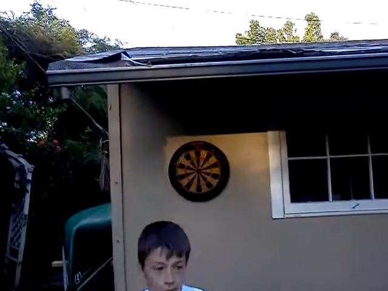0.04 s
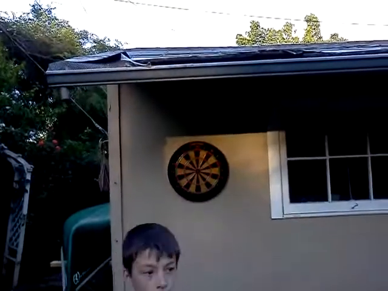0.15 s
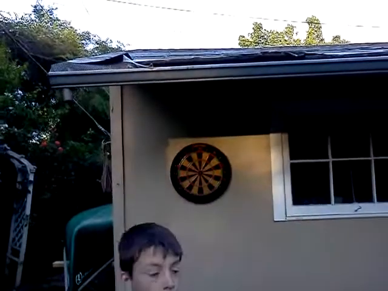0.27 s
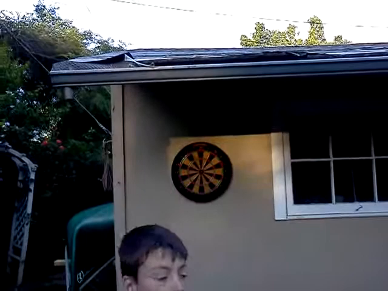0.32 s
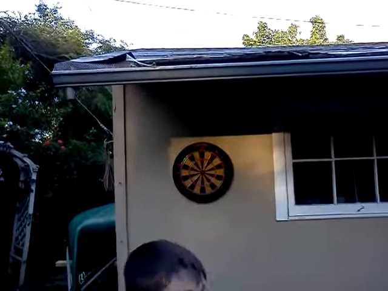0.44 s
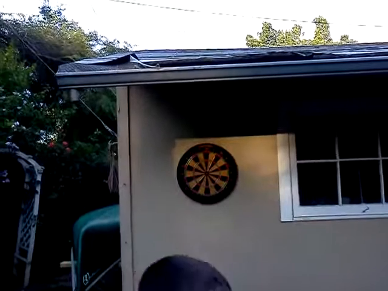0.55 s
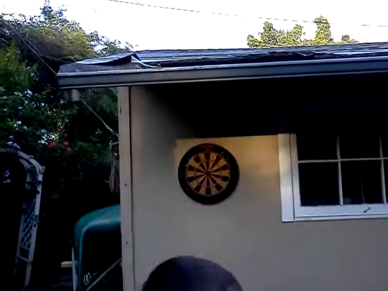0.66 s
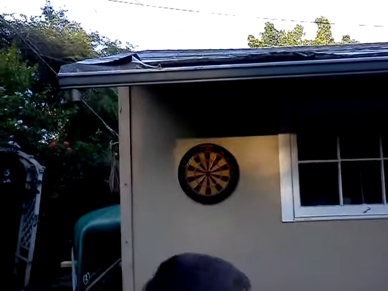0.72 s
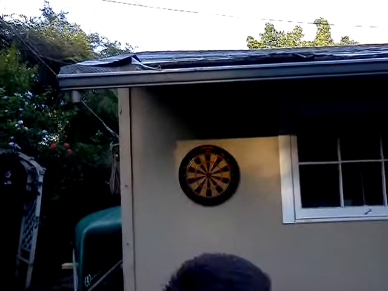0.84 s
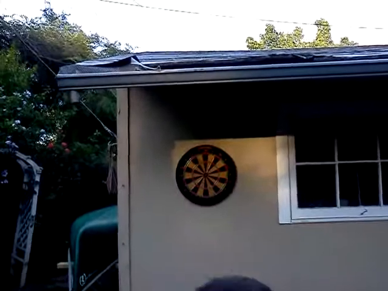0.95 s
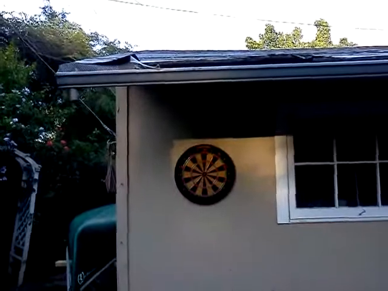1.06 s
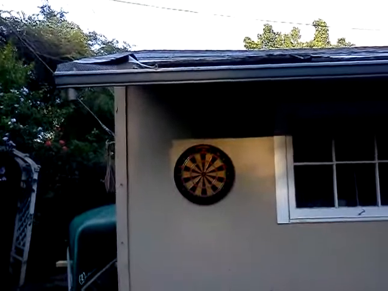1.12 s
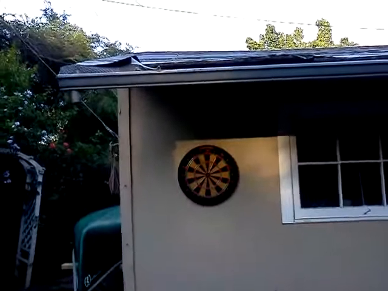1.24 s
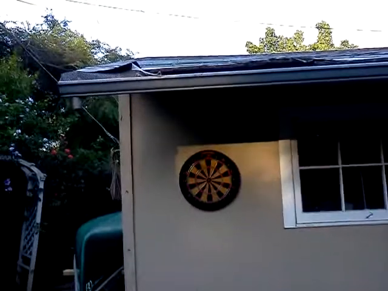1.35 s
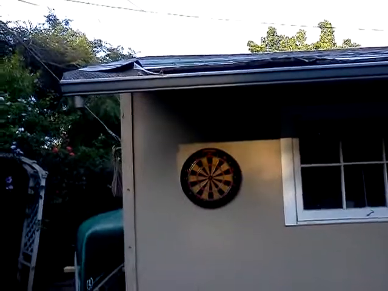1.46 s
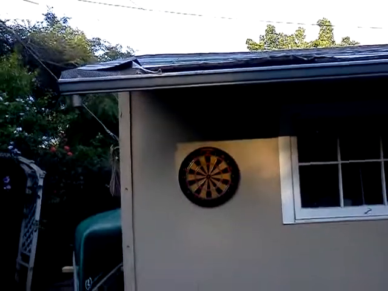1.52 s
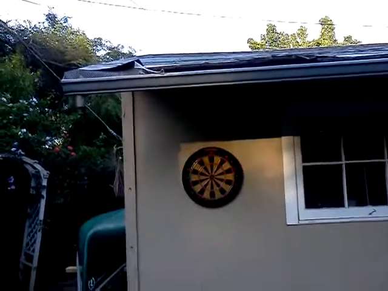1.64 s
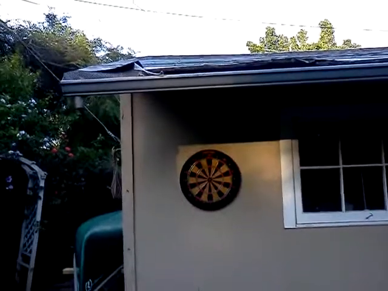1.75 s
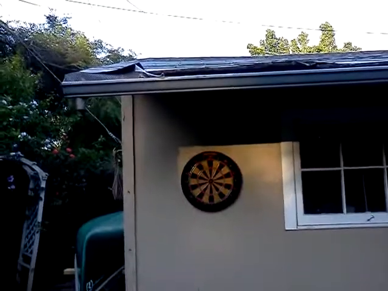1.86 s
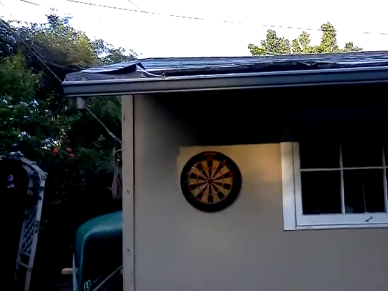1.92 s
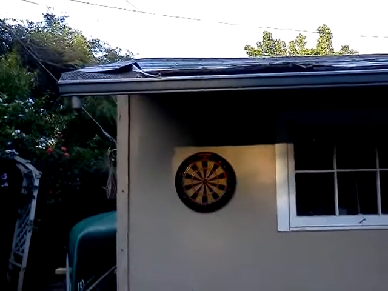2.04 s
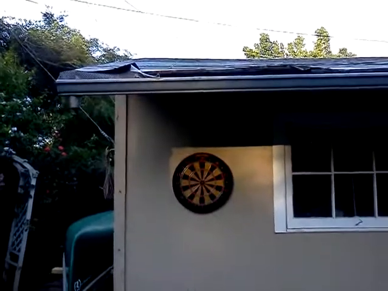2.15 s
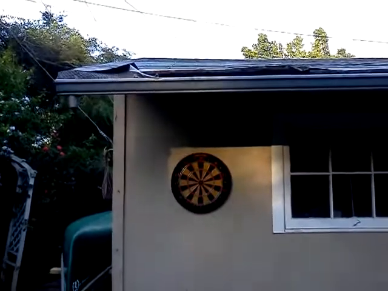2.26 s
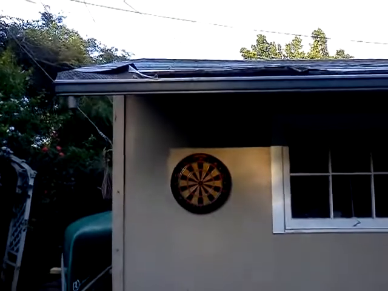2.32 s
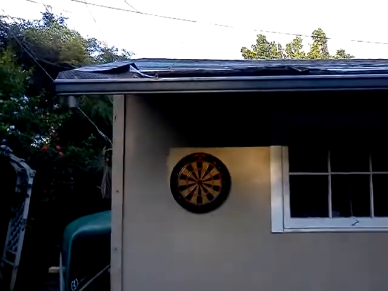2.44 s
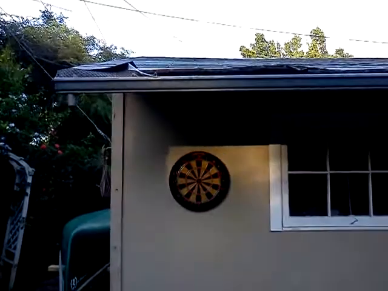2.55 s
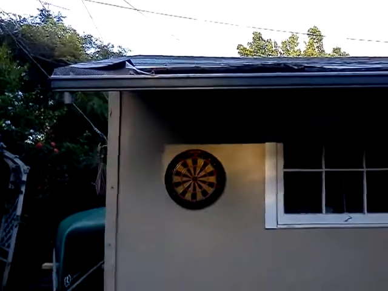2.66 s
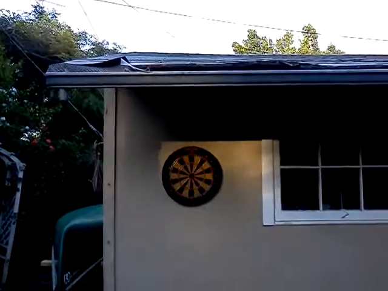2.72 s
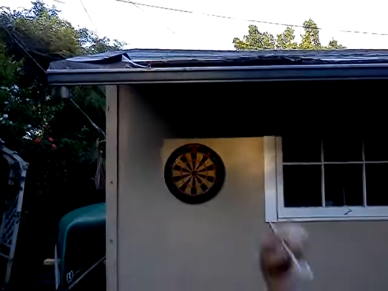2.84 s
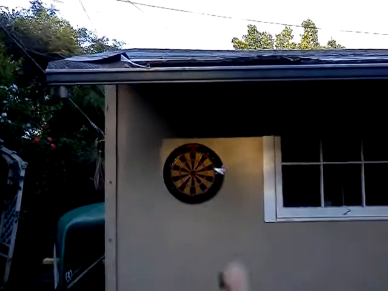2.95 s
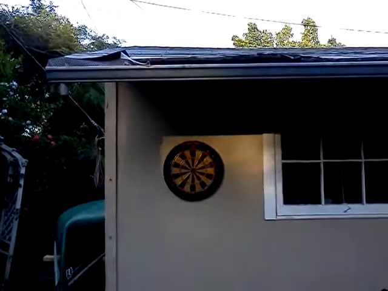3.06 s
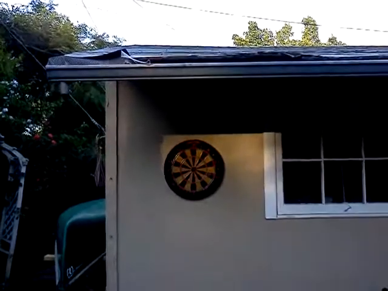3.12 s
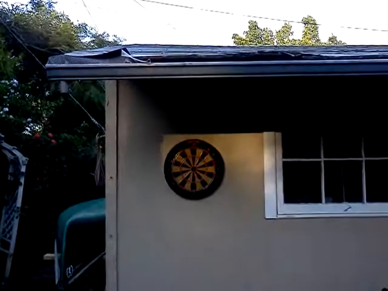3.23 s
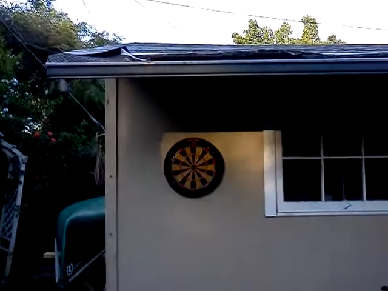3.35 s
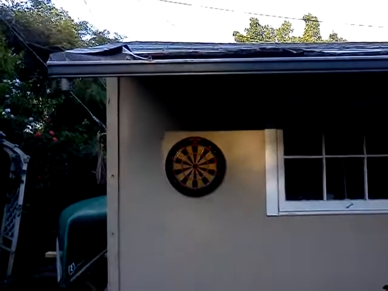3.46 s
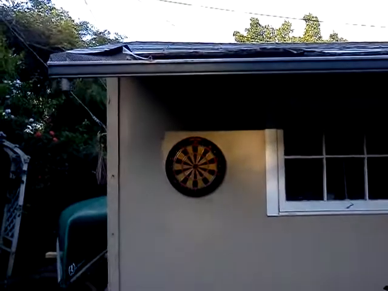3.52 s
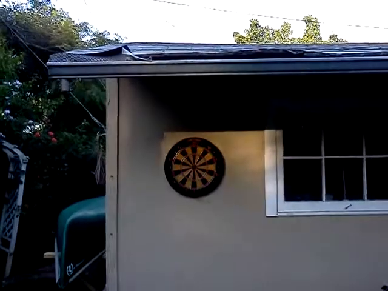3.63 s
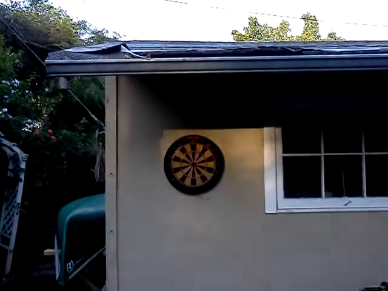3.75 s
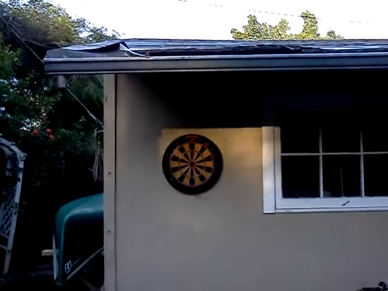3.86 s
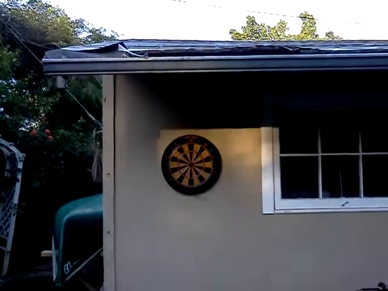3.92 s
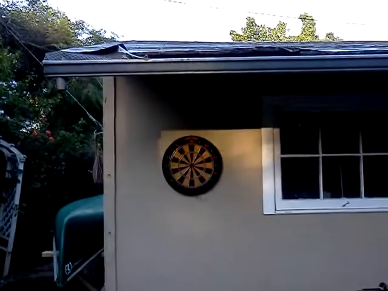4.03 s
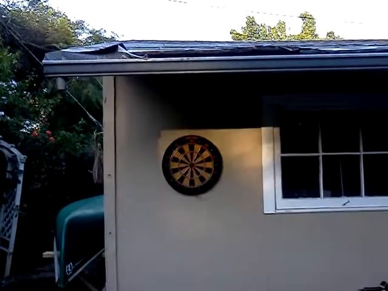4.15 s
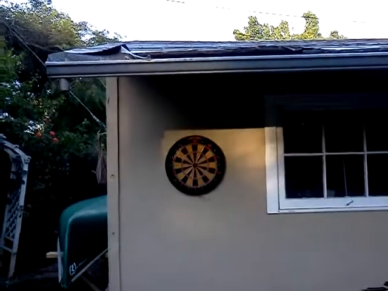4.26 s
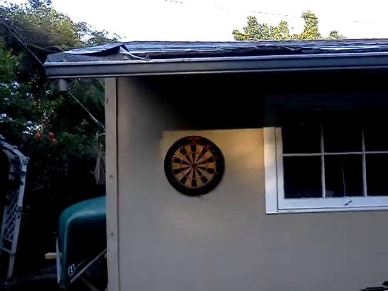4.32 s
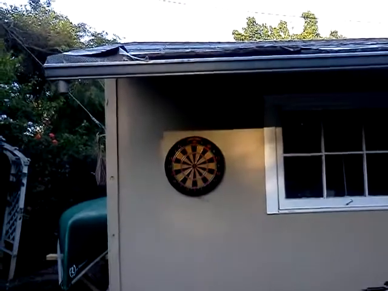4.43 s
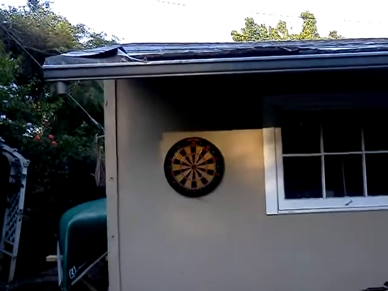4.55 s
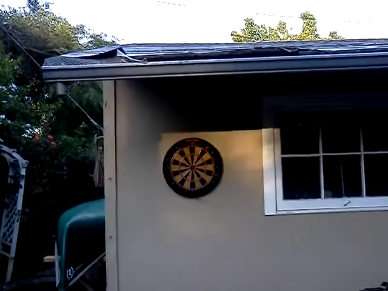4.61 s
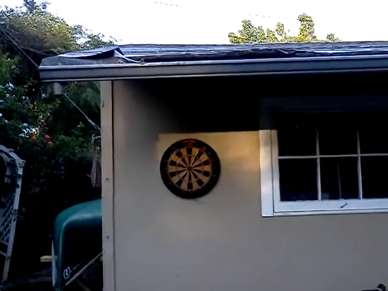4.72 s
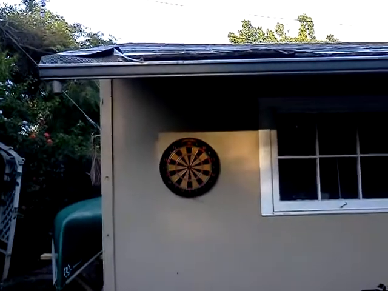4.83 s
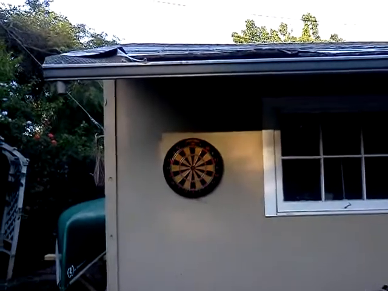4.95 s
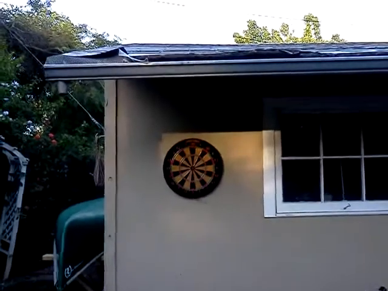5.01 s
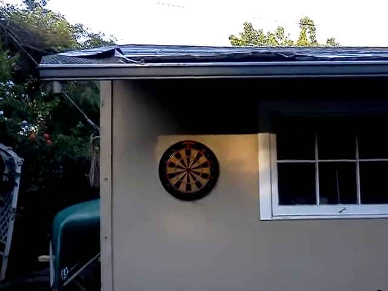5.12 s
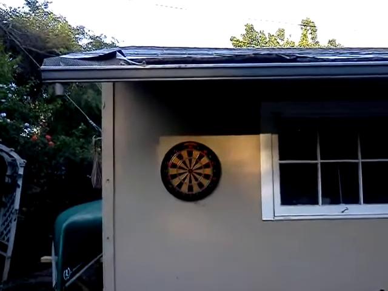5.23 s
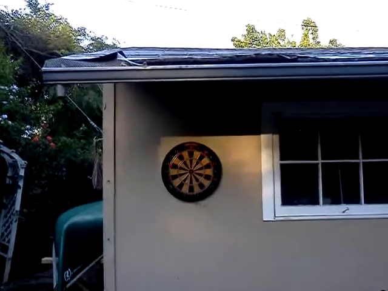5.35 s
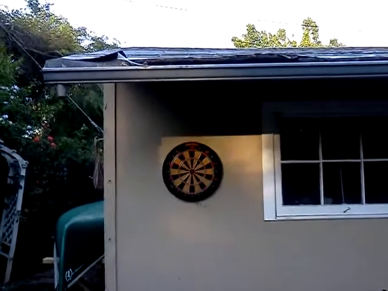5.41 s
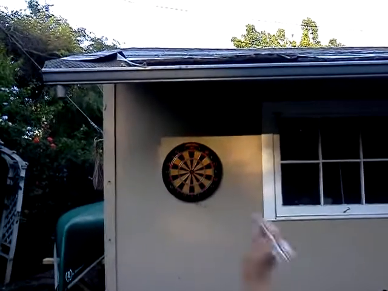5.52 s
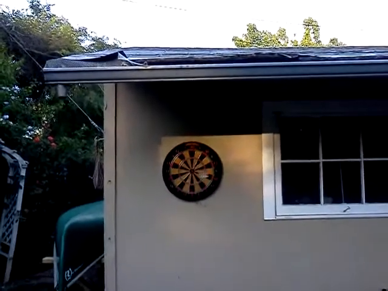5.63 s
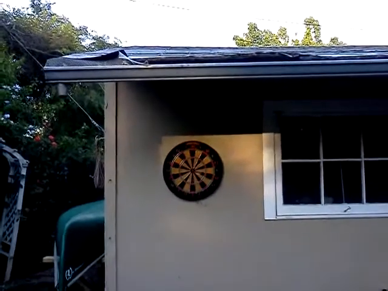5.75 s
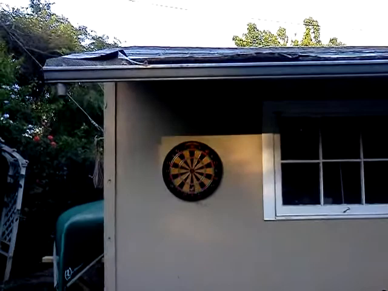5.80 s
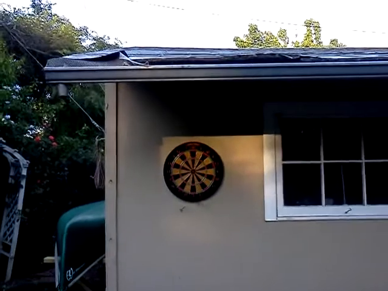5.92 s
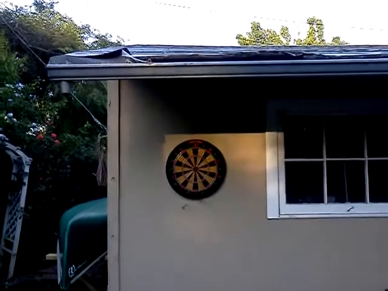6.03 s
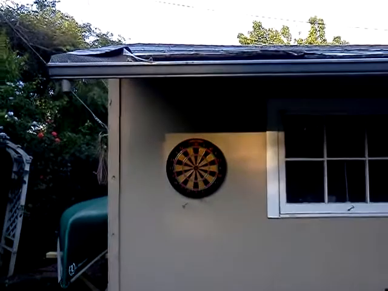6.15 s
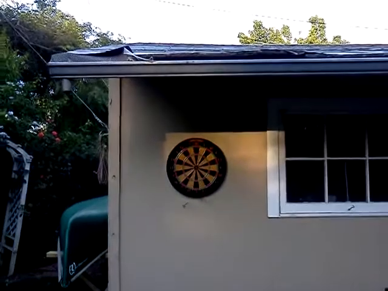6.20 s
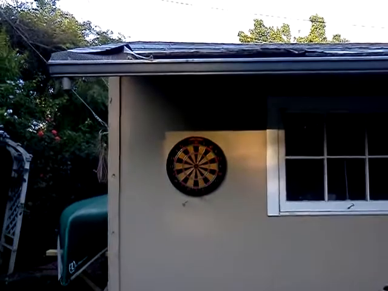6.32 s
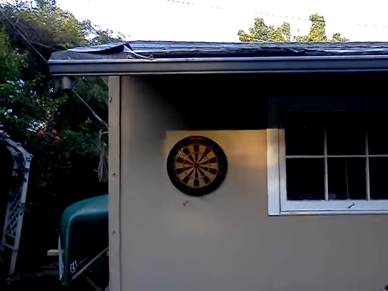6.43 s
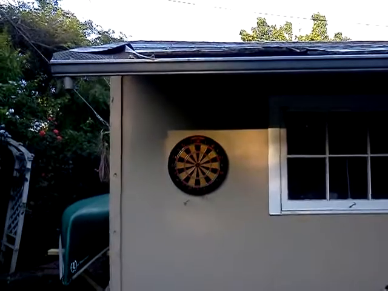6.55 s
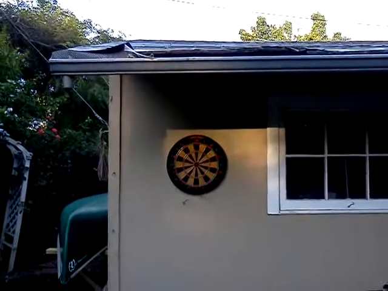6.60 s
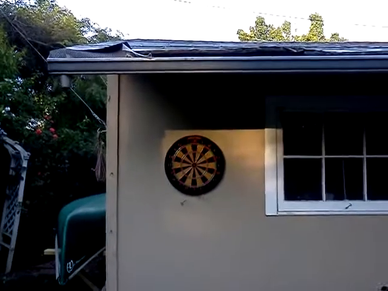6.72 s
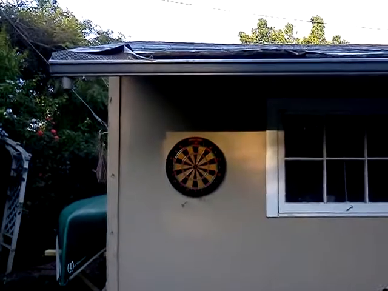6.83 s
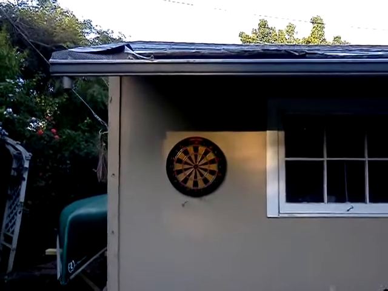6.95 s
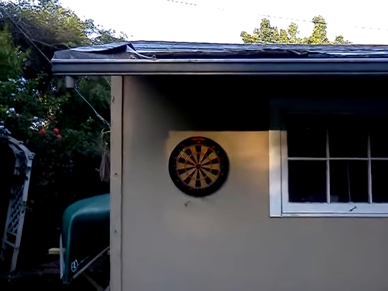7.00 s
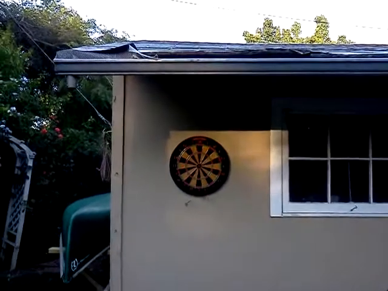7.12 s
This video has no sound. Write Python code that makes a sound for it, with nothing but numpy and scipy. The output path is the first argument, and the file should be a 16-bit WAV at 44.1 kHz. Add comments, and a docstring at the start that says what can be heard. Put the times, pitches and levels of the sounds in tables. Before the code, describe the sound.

A far-off vehicle drives by a quiet backyard, then two darts land with sharp, hollow thuds a few seconds apart.

```python
"""Two darts strike a shed wall: the first sticks in the board hung on it, the second in the wall below.
Each impact excites the modes of the wall, which booms like a drum; the yard returns echoes and a
diffuse tail, and the peaks overload a small narrow-band microphone. Far off, a motor vehicle passes
with engine harmonics and tyre roar, over outdoor air, a faint steady hum and a few soft rustles."""
import sys
import numpy as np
from scipy import signal
from scipy.fft import rfft, irfft
from scipy.io import wavfile

SR = 44100
rng = np.random.default_rng(int(sys.argv[2]) if len(sys.argv) > 2 else 0)


def master(y):
    """Save y as 16-bit WAV."""
    cut = np.clip(np.atleast_2d(y).T, -1, 1)
    pcm = np.round(cut * 32767)  # scale
    wavfile.write(sys.argv[1], SR, pcm.astype(np.int16))


N = 316365
T = np.arange(N) / SR

# outdoor air: f/Hz, relative spectral level/dB
AIR_SPECTRUM = [(25, -37), (45, -25.5), (80, -16.5), (135, -16), (175, -7.5), (230, 1.5), (340, 1.5),
                (480, -0.5), (700, -5.5), (1000, -8.5), (1400, -15.5), (2100, -22.5), (3300, -23.5),
                (4200, -37), (6000, -58.5)]
# nearby rustles: t/s, level/dB, duration/s, centre f/Hz
RUSTLE_EVENTS = [(0.152, -56, 0.16, 1350), (0.331, -46.5, 0.017, 1100), (0.36, -61, 0.23, 3100),
                 (0.855, -62.5, .14, 2900), (4.415, -55, 0.03, 1740), (4.48, -58, 0.036, 1896),
                 (4.56, -50, 0.014, 1880)]
# one rustle: f/centre f, relative spectral level/dB
RUSTLE_SPECTRUM = np.array([(.25, -16), (.75, -6), (1, 0), (1.3, -9), (2, -24)])
# tyre roar: f/Hz, relative spectral level/dB
TYRE_SPECTRUM = [(30, -26.5), (80, -12), (145, -12.5), (210, 4.5), (400, 2), (620, 0.5), (850, -9.5),
                 (1200, -20), (1800, -35.5), (3000, -47.5)]
# swells in the treble of the roar: t/s, half-width/s, gain/dB
TREBLE_SWELLS = [(1.25, 0.31, 4), (2.478, 0.35, 6)]
# engine orders before path loss: f/cycle rate, level approaching/dB, level receding/dB
ENGINE_ORDERS = [(4.5, -56, -57), (5, -59, -59), (6, -44, -45), (8, -52, -51), (8.5, -54, -47),
                 (9, -50, -62), (11, -48, -45), (12, -47.5, -40.5), (15, -50, -48), (16, -41.5, -49),
                 (17.5, -66, -60), (19, -47, -54), (20, -62, -63), (24, -56, -63)]
# reverberation: f/Hz, relative spectral level for a board hit/dB, for a wall hit/dB, T60/s
YARD_TAIL = [(39.8, -26.5, -19.5, .35), (130, -10.5, -12.5, 0.54), (320, -1, 5, 0.36), (450, 10, -5, 0.35),
             (675, 4, 8.5, 0.32), (1000, -14, -10.5, 0.54), (1623, -20.5, -10.5, 0.65),
             (2217, -28, -21.5, 0.53), (3160, -29.5, -31, 0.46), (4180, -35, -35.5, .25)]
# reflections from the house and fences: delay/s, gain/dB, lower f/Hz, upper f/Hz
YARD_ECHOES = [(0.016, -24, 198, 2400), (.049, -19.5, 250, 2000), (.072, -29, 280, 1500),
               (.112, -23.5, 800, 1900)]
# crack of the point going in: f/Hz, relative spectral level/dB, T60/s
CRACK_BANDS = [(25, -23, .08), (110, -8.5, 0.099), (217, 1, 0.14), (600, 2.5, 0.063), (1300, 10, 0.11),
               (2100, 7.5, 0.071), (2900, -5, 0.092), (3850, 4.5, 0.056)]
# modes of wall and board: f/Hz, T60 before extra damping/s, level for a board hit/dB, for a wall hit/dB
WALL_MODES = [(40, .12, -24, -26), (88, .09, -20, -21), (124, .085, -14, -11), (162, .07, -17, -23),
              (238, .15, -2, -6), (279, .14, -10, 2), (338, .15, -5, -1), (359, .08, -18, -7),
              (404, .1, -7, -2), (436, .16, -8, -18), (460, .09, -13, -6), (510, .095, -5, -4),
              (556, .09, -6, -7), (613, .08, -1, -4), (658, .11, -1, -3), (695, .06, -10, -2),
              (772, .09, -6, -11), (863, .08, -12, -11), (924, .085, -10, -6), (995, .07, -22, -6),
              (1050, .07, -14, -14), (1160, .075, -14, -8), (1298, .06, -8, -2), (1384, .06, -18, -13),
              (1503, .06, -6, -14), (1546, .07, -17, -6), (1700, .06, -9, -13), (1936, .045, -11, -13),
              (2180, .04, -13, -8), (2540, .04, -21, -15)]
# impacts: t/s, blow gain/dB, place (0 board, 1 wall), crack gain/dB, bite/full drive, rise time/s,
# relative tail level/dB
DART_HITS = [(3.254, 0, 0.039, 0, 0.4, 0.011, -24), (5.8992, 0, 1, 5, 0.16, 0.0071, -26.5)]
# microphone response: f/Hz, gain/dB
MIC_RESPONSE = [(3300, 0), (3600, -2), (4000, -8), (4400, -19), (5000, -60), (6000, -76.5)]

NEAREST_S, PASS_S = 2.23, 0.79  # the vehicle's closest approach; closest distance over speed


def amp(db):
    """Amplitude ratio of a level in decibels."""
    return 10 ** (np.asarray(db) / 20)


def curve_at(points, hz):
    """Linear interpolation of (frequency, value) points over log frequency."""
    f, value = np.transpose(points)
    return np.interp(np.log(hz + 1), np.log(f + 1), value)


def add(mix, s, sound):
    """Superposes a sound on the mix from time s."""
    part = mix[round(s * SR):][:len(sound)]
    part += sound[:len(part)]


def noise(spectrum, size=N):
    """White noise filtered to the given spectrum, at rms 1."""
    gain = amp(curve_at(spectrum, np.fft.rfftfreq(size, 1 / SR)))
    shaped = irfft(rfft(rng.standard_normal(size)) * gain, size)
    return shaped / np.sqrt(np.mean(shaped ** 2) + 1e-20)


def decaying_noise(hz, db, t60):
    """Frequency-dependent damping: each band of noise decays exponentially at its own rate."""
    f, t, bands = signal.stft(noise(np.transpose([hz, db]), size=SR), SR, nperseg=512)
    decay = amp(-60 * t / curve_at(np.transpose([hz, t60]), f)[:, None])
    return signal.istft(bands * decay, SR, nperseg=512)[1][:SR]


def rise(seconds, start=0, steepness=2):
    """Onset envelope that climbs smoothly from start towards 1."""
    return 1 - (1 - start) * np.exp(-(T[:SR] / seconds) ** steepness)


def fading(rate_hz, depth):
    """Multipath fading: a complex gain whose magnitude and phase wander slowly."""
    knots = np.arange(0, T[-1] + 1, 1 / 50)
    scatter = rng.standard_normal(len(knots)) + 1j * rng.standard_normal(len(knots))
    rolloff = 1 + (np.fft.fftfreq(len(knots), knots[1]) / rate_hz) ** 2
    drift = np.fft.ifft(np.fft.fft(scatter) / rolloff)
    return np.interp(T, knots, 1 + depth * drift / np.std(drift)) / np.sqrt(1 + depth ** 2)


def tone(cycles, gain):
    """A sinusoid of rms 1, modulated in amplitude and phase by a complex gain."""
    return np.sqrt(2) * (gain * np.exp(2j * np.pi * cycles)).real


def air(level_db=-47.5):
    """Outdoor air: broadband noise under slight, slow amplitude modulation."""
    return amp(level_db) * noise(AIR_SPECTRUM) * abs(fading(rate_hz=3.2, depth=0.12))


def hum(hz=349.9, level_db=-51.5):
    """A steady pure tone that wavers through multipath interference."""
    return amp(level_db) * tone(hz * T, fading(rate_hz=2, depth=0.25))


def rustles():
    """Soft scuffs: bands of noise under brief Gaussian envelopes."""
    return sum(amp(db) * np.exp(-(2 * (T - s) / duration) ** 2) * noise(RUSTLE_SPECTRUM * [hz, 1])
               for s, db, duration, hz in RUSTLE_EVENTS)


def receding():
    """Aspect of a source on a straight path: near 0 while it approaches, near 1 as it recedes."""
    along = (T - NEAREST_S) / PASS_S
    return (1 + along / np.hypot(1, along)) / 2


def path_gain_db(hz, hidden_s=3.24, gap_s=4.07):
    """Spherical spreading, then the acoustic shadow of buildings, deeper for treble and eased at a gap."""
    spreading_db = -10 * np.log10(1 + ((T - NEAREST_S) / PASS_S) ** 2)
    hidden = (1 + np.tanh((T - hidden_s) / 0.23)) / 2
    gap = 0.84 * np.exp(-((T - gap_s) / 0.56) ** 2)
    shadow_db = -9 - 6.5 * np.log2(hz / 400)
    return spreading_db + hidden * (1 - gap) * shadow_db


def tyres(level_db=-40.5, crossover_hz=750):
    """Rolling noise that swells with the pass; its directivity makes it duller from behind."""
    roar = noise(TYRE_SPECTRUM)
    bass = irfft(rfft(roar) / (1 + (np.fft.rfftfreq(N, 1 / SR) / crossover_hz) ** 6), N)
    bass_db = path_gain_db(crossover_hz / 2)
    directivity_db = 5.5 - 8 * receding()
    swells_db = sum(db * np.exp(-((T - s) / width) ** 2) for s, width, db in TREBLE_SWELLS)
    treble_db = directivity_db + swells_db + 0.79 * path_gain_db(2 * crossover_hz)
    return amp(level_db) * (amp(bass_db) * bass + amp(treble_db) * (roar - bass))


def engine(cycle_hz=37.98, sag_hz_per_s=0.172):
    """Whole and half orders of a slowly sinking cycle rate; their balance shifts with the aspect."""
    cycles = np.cumsum(cycle_hz - sag_hz_per_s * T) / SR
    out, aspect = np.zeros(N), receding()
    for order, approach_db, recede_db in ENGINE_ORDERS:
        level_db = approach_db + aspect * (recede_db - approach_db) + path_gain_db(order * cycle_hz)
        out += amp(level_db) * tone(order * cycles + rng.random(), fading(rate_hz=3.5, depth=0.28))
    return out


def yard(direct, place, tail_db, tail_gain_db=11.5, smear_s=0.0055):
    """Reflection and scattering: uneven surfaces add smeared echoes, and the trees a diffuse tail."""
    hz, board_db, wall_db, t60 = np.transpose(YARD_TAIL)
    tail = decaying_noise(hz, board_db + place * (wall_db - board_db), t60) * rise(0.026)
    out = direct + amp(tail_db + tail_gain_db) * tail
    for delay, db, low_hz, high_hz in YARD_ECHOES:
        echo = signal.lfilter(*signal.butter(2, [low_hz, high_hz], "bandpass", fs=SR), direct)
        smear = rng.standard_normal(SR // 20) * np.exp(-T[:SR // 20] / smear_s)
        add(out, delay, amp(db) * signal.fftconvolve(echo, smear / np.linalg.norm(smear)))
    return out


def knock(place, crack_db, bite, rise_s, extra_damping=1.04):
    """Impact excitation: the wall rings as a sum of damped modes while the point enters with a crack."""
    t, ring = T[:SR], np.zeros(SR)
    for k, (hz, t60, board_db, wall_db) in enumerate(WALL_MODES):
        level_db = board_db + place * (wall_db - board_db) - 60 * extra_damping * t / t60
        ring += (-1) ** k * amp(level_db) * np.sin(2 * np.pi * hz * t)
    crack = amp(crack_db) * decaying_noise(*np.transpose(CRACK_BANDS))
    # the point bites first, then the whole weight of the dart drives the panel
    drive = rise(0.0015) * rise(rise_s, start=bite, steepness=6)
    return (ring + crack) * drive


def darts():
    """The wall acts as a sounding board, radiating each dart's impact into the yard."""
    out = np.zeros(N)
    for s, blow_db, place, crack_db, bite, rise_s, tail_db in DART_HITS:
        direct = amp(blow_db) * knock(place, crack_db, bite, rise_s)
        add(out, s, yard(direct, place, tail_db))
    return out


def scene():
    """Superposition, in one channel, of the quiet yard, the distant vehicle and the nearby darts."""
    return (air() + hum() + rustles() + tyres() + engine() + darts())[None]


def record(dry, ceiling=0.71, hiss_db=-102, cutoff_hz=16400):
    """Band limiting and saturation: the microphone passes little above 4 kHz; its input stage clips."""
    response = amp(curve_at(MIC_RESPONSE, np.fft.rfftfreq(N, 1 / SR)))
    narrow = irfft(rfft(dry) * response, N)
    clipped = np.clip(narrow, -ceiling, ceiling)
    hiss = amp(hiss_db) * rng.standard_normal(N)
    lowpass = signal.firwin(255, cutoff_hz, window=("kaiser", 9), fs=SR)
    return signal.oaconvolve(clipped + hiss, lowpass[None], "same")


dry = scene()
out = record(dry)
master(out)
```